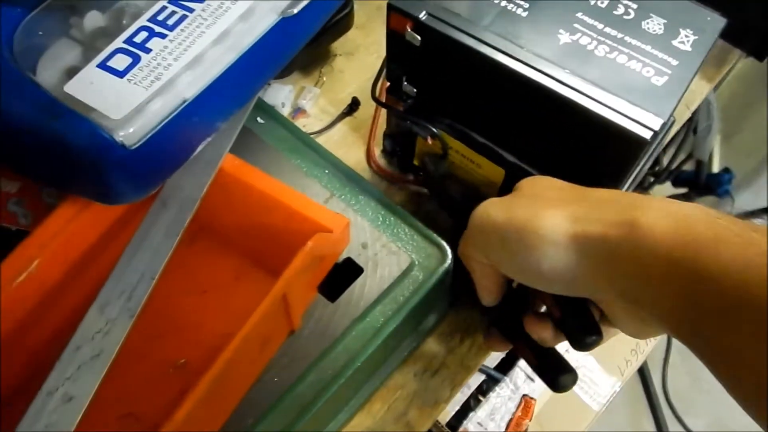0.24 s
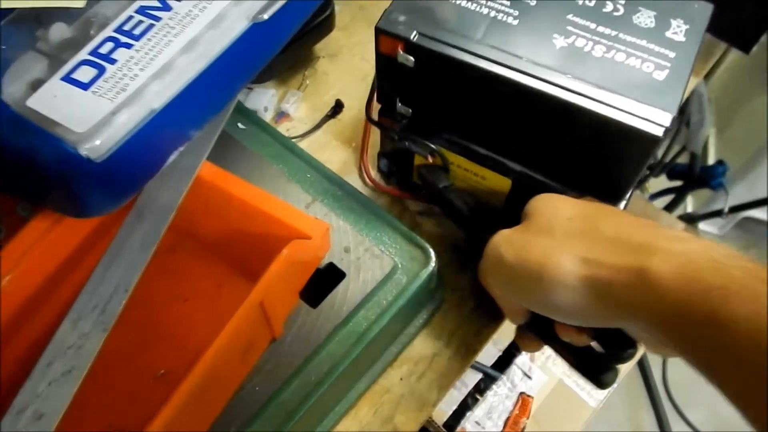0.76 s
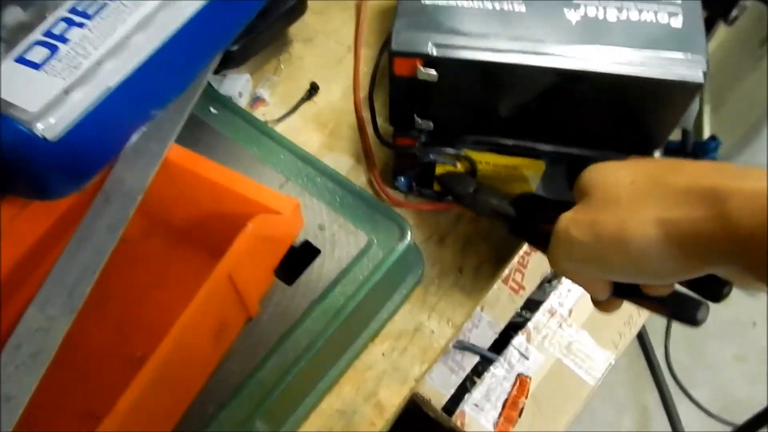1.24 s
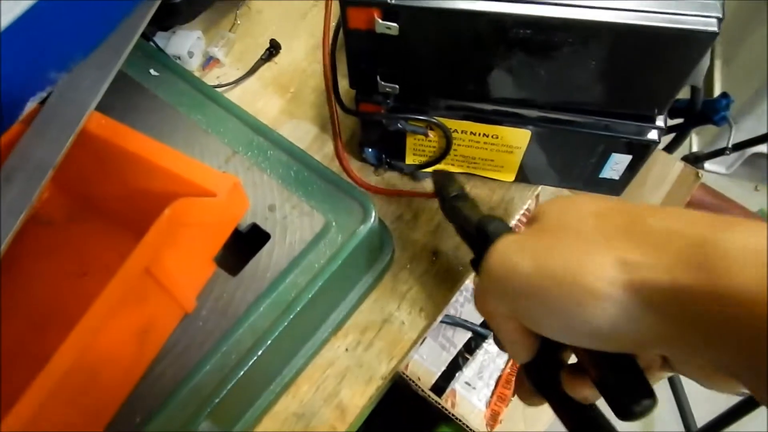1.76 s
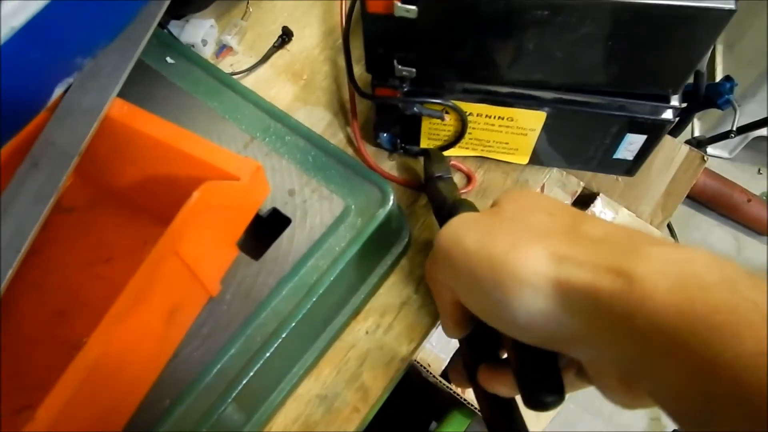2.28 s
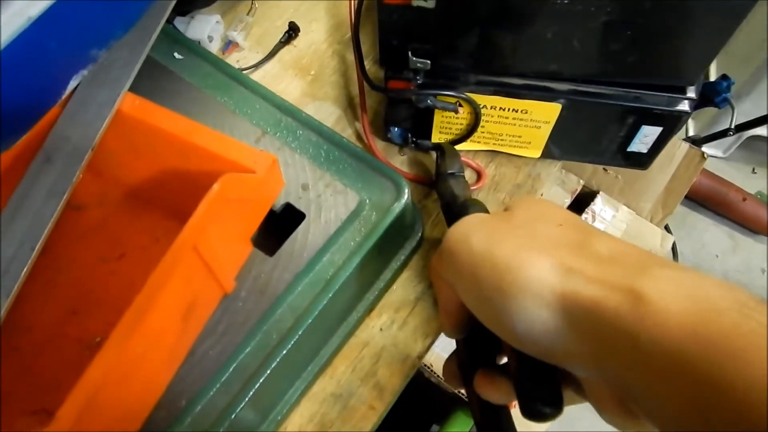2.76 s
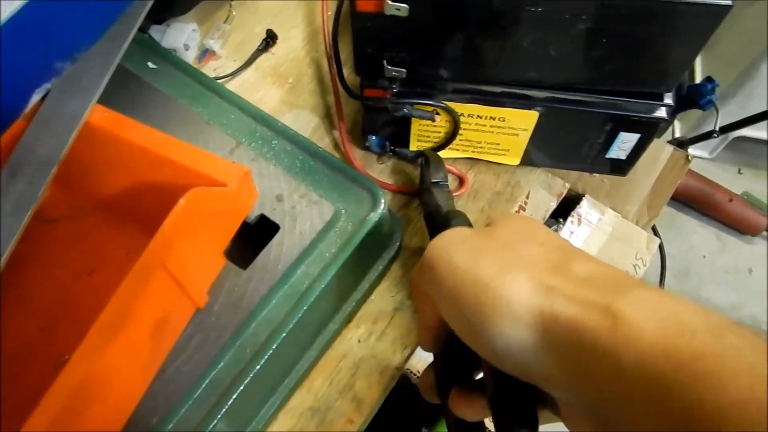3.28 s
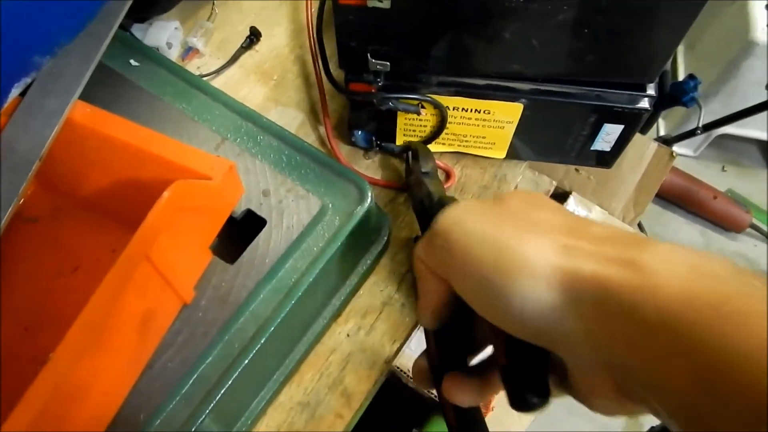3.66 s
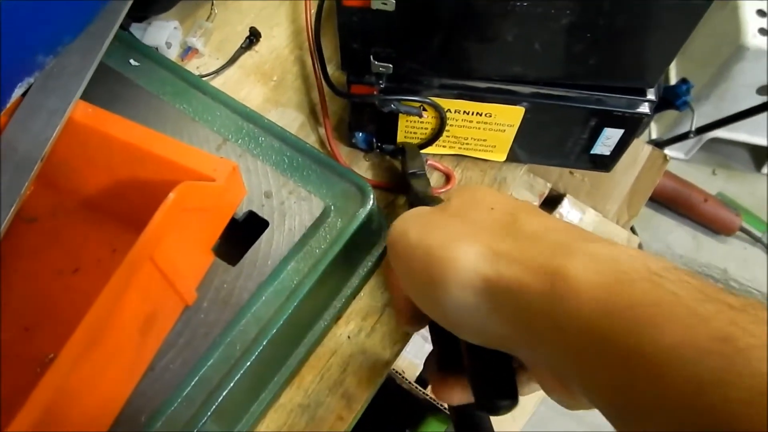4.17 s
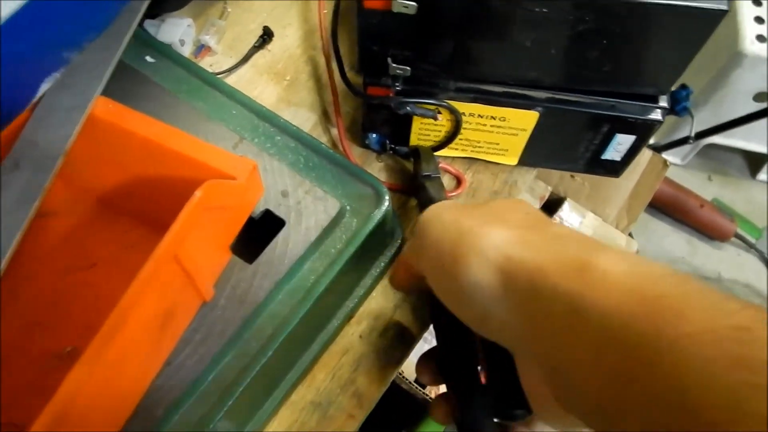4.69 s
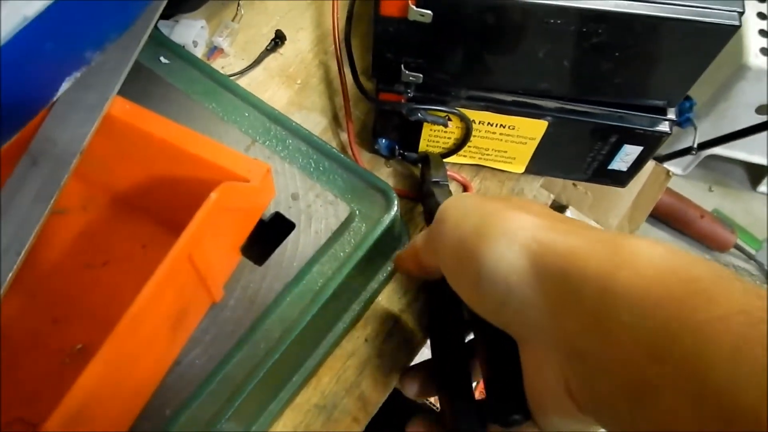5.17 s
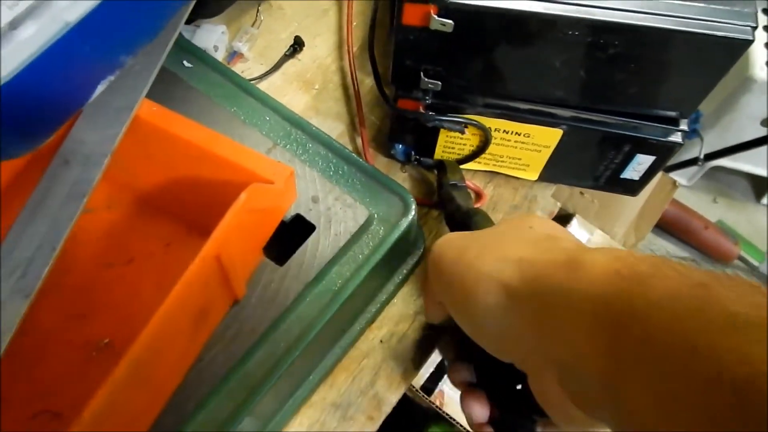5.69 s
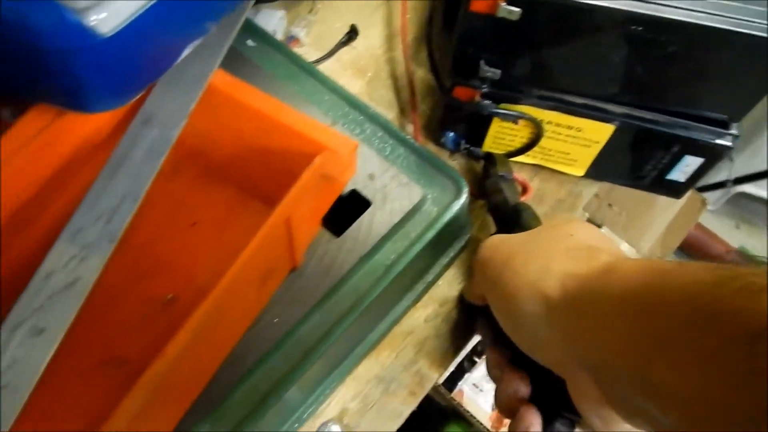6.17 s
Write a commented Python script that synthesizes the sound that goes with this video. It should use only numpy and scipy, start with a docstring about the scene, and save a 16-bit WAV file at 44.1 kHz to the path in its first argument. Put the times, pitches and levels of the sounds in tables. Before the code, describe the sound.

Workbench handling heard close: clustered woody cracks, a light uneven scrape, another sharp knock, fine bright skin and wire rustle. Quieter positioning follows, with soft dull thumps over low, wavering room rumble and faint hiss. Taps resume late, then the cutters bite through the wire with a very short, hard steel click and a dull jolt, in a small room with little echo.

```python
"""Wire cutters on a cluttered workbench

Close to a small camera in a quiet shed, a tool drags and knocks on boxes: grit and cracks ring their modes.
At last the jaws snap through a wire, bursts of chatter ringing the steel. The hand rustles as fine bright
grit with thin noise-band whistles, and the bench thumps in short low cycles of nearly steady pitch, over
a room tail and shaped air noise. The two microphones sit behind small ports that ring near 5 kHz."""
import sys
import numpy as np
from scipy import signal
from scipy.fft import rfft, irfft
from scipy.io import wavfile
from scipy.ndimage import uniform_filter1d

SR = 44100
rng = np.random.default_rng(int(sys.argv[2]) if len(sys.argv) > 2 else 0)


def store_wav(level_fs):
    """Save 16-bit WAV to argv[1]."""
    pcm = np.round(np.clip(np.atleast_2d(level_fs), -1, 1) * 32767)
    wavfile.write(sys.argv[1], SR, pcm.T.astype(np.int16))


N = 283862
T = np.arange(N) / SR
HZ = np.maximum(np.arange(N // 2 + 1) * SR / N, 1)  # bins of the spectrum, kept above 0 for the logarithm

# low modes of the boxes and bench: f/Hz, level/dB, t60/s
BOOM_MODES = [(139, -6.5, 0.088), (198.5, -6, 0.16), (239.7, 1.5, 0.13), (310, -3.5, 0.08),
              (344.5, -7, 0.09), (460, -6.5, 0.063), (521, -6, 0.13), (596, -5.5, 0.094), (732, -19, 0.33)]
# higher modes of the boxes and bench: f/Hz, level/dB, t60/s
BODY_MODES = [(803, 2, 0.072), (973, -3, 0.054), (1230, 3.5, 0.012), (1430, 4, 0.0085), (1660, 1.5, 0.021),
              (1860, -2, 0.023), (2128, -2, 0.06), (2293, -3.5, 0.065), (2694, -6.5, 0.012),
              (3154, -33.5, 0.043)]
# response of a microphone port: f/Hz, level/dB
PORT_RESPONSE = [(20, -0.5), (3000, 0.5), (3900, -7), (4400, -3.5), (4900, 8), (5300, 8.5), (5600, 6.5),
                 (6000, 2.5), (7000, -1), (8500, -2.5), (16000, -21)]


def undb(db):
    """Gain of a level in dB."""
    return 10 ** (np.asarray(db) / 20)


def along(table, column=1):
    """A column of a (Hz, ..) table on the spectrum's bins, interpolated over log frequency."""
    rows = np.array(table, float)
    return np.interp(np.log(HZ), np.log(rows[:, 0]), rows[:, column])


def heard(x, lo_hz, hi_hz):
    """The band lo_hz-hi_hz of x as it comes through the port."""
    in_band = (HZ > lo_hz) * (HZ < hi_hz)
    return irfft(rfft(x, N) * undb(along(PORT_RESPONSE)) * in_band, N)


def unit(x, lo_hz, hi_hz):
    """x scaled to rms 1 in the band lo_hz-hi_hz behind the port."""
    return x / np.std(heard(x, lo_hz, hi_hz))


def band(x, lo_hz, hi_hz):
    """Gentle band-pass."""
    return signal.sosfilt(signal.butter(2, [lo_hz, hi_hz], "band", fs=SR, output="sos"), x)


def lag(x, seconds):
    """One-pole smoothing."""
    keep = np.exp(-1 / (seconds * SR))
    return signal.lfilter([1 - keep], [1, -keep], x)


def ring(x, modes):
    """x drives a set of decaying (Hz, dB, t60) modes of alternating sign."""
    out = 0
    for k, (hz, db, t60) in enumerate(modes):
        pole = np.exp(2j * np.pi * hz / SR - np.log(1000) / (t60 * SR))
        mode = signal.lfilter([1], [1, -pole], x).imag
        out = out + (-1) ** k * undb(db) * mode / np.sqrt(t60)
    return out


def grit(rate_hz, spread_db):
    """Dense tiny slips at random moments, of very uneven size."""
    slips = rng.random(N) < rate_hz / SR
    return slips * rng.standard_normal(N) * undb(spread_db * rng.exponential(size=N))


def walk(rate_hz):
    """Slow random wander with spread 1: held random values smoothed twice."""
    k = int(SR / rate_hz)
    steps = np.repeat(rng.standard_normal(N // k + 1), k)
    x = uniform_filter1d(uniform_filter1d(steps, k), k)[:N]
    return x / x.std()


def steady(x, seconds):
    """x with its slow swells evened out."""
    return x / np.sqrt(uniform_filter1d(x ** 2, int(seconds * SR)) + 1e-12)


def swell(start, length):
    """Envelope of one movement: smooth attack, hold, smooth release."""
    # each ramp takes a share of the length, up to a longest time in s
    rise = (T - start) / min(0.33 * length, 0.13)
    fall = (start + length - T) / min(0.71 * length, 0.28)
    return np.sin(np.pi / 2 * np.clip(np.minimum(rise, fall), 0, 1)) ** 2


def add(out, s, x):
    """Lays x into out from s seconds on."""
    i = int(s * SR)
    out[..., i:i + x.shape[-1]] += x[..., :N - i]


def drags():
    """Dense stick-slip grit shakes the box walls (rasp) and their hollow (boom)."""
    # strokes of the tool over the boxes: t/s, length/s, rasp level/dB, boom minus rasp/dB
    strokes = [(0.169, 0.074, -57, 8), (0.23, 0.035, -48, -8), (0.267, 0.23, -78.5, 23.5),
               (0.581, 0.77, -54.5, 10.5), (1.351, 0.031, -59.5, 3), (1.379, 0.1, -57.5, -7),
               (1.458, 0.019, -56, -7), (1.487, 0.053, -53.5, 7.5), (1.512, .055, -39.5, -11),
               (1.548, 0.083, -57, 0), (1.723, 0.22, -62, -9), (1.965, 0.096, -57, -19),
               (2.082, 0.062, -43.5, -30), (2.129, 0.054, -76.5, 21), (2.959, 0.16, -65, 3.5),
               (3.668, 0.18, -58.5, -12), (4.528, 0.07, -53.5, -0.5), (4.703, 0.16, -74.5, 14),
               (5.285, 0.27, -52.5, 3), (5.95, 0.41, -66, 1.5), (6.269, 0.12, -58, -3)]
    slips = grit(6000, 1.5) * undb(2.2 * walk(30))
    walls = unit(ring(slips, BODY_MODES), 900, 3200)
    scrape = unit(band(slips, 730, 2900), 900, 3200)
    rasp = unit(walls + 0.29 * scrape, 600, 3200)
    boom = unit(steady(ring(slips, BOOM_MODES), .12), 180, 700)
    return sum(swell(s, length) * undb(db) * (rasp + undb(boom_db) * boom)
               for s, length, db, boom_db in strokes)


def knocks():
    """A crack at the contact, then loose parts rattle on and keep the modes going."""
    # knocks and ticks: t/s, crack peak level/dB, boom minus crack/dB, tick minus crack/dB,
    # centre of the crack f/Hz, t60 of the rattle that drives the modes/s
    contacts = [(0.175, -35.5, -2, -24, 1320, 0.11), (0.252, -29, 0.5, -18, 1200, 0.052),
                (0.272, -23.5, -7, -27, 1330, 0.018), (0.364, -56, 8.5, -18, 1340, .08),
                (0.613, -50.5, 10.5, -19, 1240, 0.074), (0.803, -41, 7.5, -7.5, 1430, 0.12),
                (0.886, -46, -7, -22, 1860, .05), (0.945, -43.5, 8, -19, 1240, .05),
                (1.116, -42.5, 4.5, -13, 2180, 0.11), (1.213, -51, 11, -22, 1660, .1),
                (1.47, -40, -18, -22, 1500, .07), (1.477, -28.5, -11.5, -27, 1700, 0.11),
                (1.5136, -21, -12.5, -17.5, 1650, .1), (1.618, -40, 3, -29, 900, .11),
                (1.739, -45.5, -18, -11, 1010, .08), (2.001, -43.5, -3.5, -18, 1430, 0.043),
                (2.055, -51, -1, 3.5, 1340, 0.044), (2.2, -38.5, -15, -24, 1430, 0.051),
                (3.052, -54, -8, 2, 1020, .07), (3.878, -52, 1.5, -6, 1440, 0.11),
                (3.997, -50.5, -6, -1.5, 1330, 0.056), (4.028, -47.5, -8, 2.5, 2100, 0.11),
                (4.542, -44, -1.5, -1.5, 1410, 0.087), (5.255, -49, 2, -5.5, 1010, .08),
                (5.388, -36.5, -18, -12, 1230, 0.094), (5.425, -36.5, -3, -15, 1050, 0.14),
                (5.539, -48.5, -1, -4, 1690, .09), (5.669, -47, 0, -8.5, 1040, 0.11),
                (5.742, -37, -14, -27, 1030, 0.11), (6.195, -43, -2, -28, 1500, 0.13),
                (6.352, -24.5, -24, -20, 2800, 0.022), (6.388, -39.5, -6, -20, 1000, 0.072)]
    rattle_db = -4  # walls shaken by the loose parts, against the crack
    out, t = np.zeros(N), T[:SR // 6]
    for s, db, boom_db, tick_db, crack_hz, t60 in contacts:
        fade = np.exp(-np.log(1000) * t / t60)
        chance = rng.standard_normal((3, len(t)))
        rattle = chance[0] * fade
        wall = band(ring(rattle, BODY_MODES), crack_hz / 1.74, crack_hz * 1.46) * fade
        impact = (.5 * chance[1] - 1) * np.exp(-t / 0.000059)
        crack = band(impact, crack_hz / 1.41, crack_hz * 1.78)
        boom = ring(rattle * fade, BOOM_MODES)
        tick = band(chance[2] * np.exp(-t / 0.0039), 3740, 6800)
        wall, crack, boom, tick = (x / np.abs(x).max() for x in (wall, crack, boom, tick))
        knock = undb(rattle_db) * wall + crack + undb(boom_db) * boom + undb(tick_db) * tick
        add(out, s, undb(db) * knock)
    return out


def snap():
    """Bursts of even chatter ring the steel jaws; later ones are duller."""
    # the jaws break through, meet and rebound: t/s, level/dB, length of the chatter/s, upper band edge f/Hz
    bursts = [(6.3229, -15.5, .0013, 16000), (6.3253, -25, .0016, 9000), (6.3290, -25, .0016, 7000)]
    # rings of the jaws: f/Hz, width/Hz, peak level/dB
    jaw_rings = [(1350, 600, -8), (2100, 500, -2), (3000, 700, -4), (4100, 900, -5), (5250, 1000, -1),
                 (6500, 1000, -7), (8300, 1200, -10), (10300, 1100, 1), (12700, 1200, 4), (14600, 1600, 9)]
    out, t = np.zeros(N), T[:SR // 50]
    for s, db, length, top_hz in bursts:
        chatter = np.sign(rng.standard_normal(len(t))) * (t < length)
        jaws = 0
        for k, (hz, width, ring_db) in enumerate(jaw_rings):
            tone = (-1) ** k * band(chatter, hz - width / 2, hz + width / 2)
            jaws = jaws + undb(ring_db) * tone / np.abs(tone).max()
        add(out, s, undb(db) * band(jaws, 500, top_hz))
    return out


def jolt():
    """The cut jolts the right microphone through the bench: one inward shove; bass roll-off swings it back."""
    start_s, rise_s = 6.3240, .0011
    level_db = [[-26], [-3]]  # left, right: peak of the shove ahead of the roll-off
    t = np.maximum(T - start_s, 0) / rise_s
    shove = -t ** 2 * np.exp(2 - 2 * t)
    roll_off = signal.butter(2, 62, "high", fs=SR, output="sos")
    return undb(level_db) * signal.sosfilt(roll_off, shove)


def rustle():
    """Fine bright grit of skin and insulation as the hand and wire move."""
    # movements of hand and wire: t/s, length/s, level/dB, thin upper part minus level/dB
    movements = [(.165, 0.033, -71, -13), (.2, 0.11, -58, -10), (0.267, 0.45, -72.5, -15),
                 (0.604, 0.74, -62.5, -8), (1.309, 0.049, -55.5, -7), (1.351, 0.05, -61.5, -14),
                 (1.372, 0.16, -65, -1), (1.464, 0.026, -48, -14), (1.493, 0.089, -66, -16),
                 (1.71, 0.33, -62.5, -14), (1.962, .09, -57, -26), (2.057, 0.042, -61, -20),
                 (2.085, 0.06, -46.5, -28), (2.137, 0.15, -69, -10), (2.283, 0.37, -75, -11),
                 (2.928, 0.27, -68, -18), (3.103, 0.12, -73, -21), (3.238, 0.26, -68.5, -22),
                 (3.652, 0.22, -67, -12), (3.852, 0.082, -66.5, -7.5), (3.973, 0.14, -73, -7),
                 (4.122, 0.6, -77, -18), (4.328, 0.45, -66.5, -8), (4.95, 0.49, -79.5, -9),
                 (5.293, .18, -58, -11), (5.375, 0.024, -44.5, -17), (5.418, 0.05, -48, -15),
                 (5.434, 0.51, -68.5, -7), (5.826, 0.41, -73, -10), (6.223, .035, -65, -22),
                 (6.267, 0.09, -59, -10)]
    patchy_db = 1.5  # spread of the uneven level
    main = unit(band(grit(6000, 2.3), 3900, 6100), 4200, 6000)
    upper = unit(band(grit(6000, 2.2), 6300, 7300), 4840, 11000)
    moves = sum(swell(s, length) * undb(db) * (main + undb(upper_db) * upper)
                for s, length, db, upper_db in movements)
    return moves * undb(patchy_db * walk(25))


def whistles():
    """Two thin wavering whistles on the rubbing: narrow noise bands that follow a drifting pitch."""
    # one list of points a whistling spell: t/s, lower f/Hz, lower level/dB, upper f/Hz, upper level/dB
    spells = [
        [(0.3, 5050, -66, 7100, -85), (0.516, 5000, -70.5, 7230, -83), (0.68, 5110, -70, 6800, -82)],
        [(1.12, 5100, -74, 6920, -76), (1.33, 4960, -68, 6700, -67.5)],
    ]
    out = np.zeros(N)
    for s, low_hz, low_db, high_hz, high_db in map(np.transpose, spells):
        touch = np.clip(np.minimum(T - s[0], s[-1] - T) / 0.02, 0, 1)
        for hz, db in ((low_hz, low_db), (high_hz, high_db)):
            waver = lag(lag(rng.standard_normal(N), 0.0015), 0.0012)
            turns = np.cumsum(np.interp(T, s, hz)) / SR
            tone = waver * np.sin(2 * np.pi * turns)
            out += touch * undb(np.interp(T, s, db)) * unit(tone, 4000, 8000)
    return out


def thumps():
    """Short, soft low cycles of nearly steady pitch that swell fast and stop; the boxes ring on a little."""
    # soft thumps through the bench: t/s, level ahead of the envelope/dB, starting pitch f/Hz, length/s
    bumps = [(1.401, -38.5, 90, 0.028), (2.069, -46, 130, 0.089), (2.141, -39.5, 95, 0.03),
             (2.209, -41.5, 227, 0.018), (2.444, -47.5, 235, 0.036), (2.601, -49.5, 64.5, 0.12),
             (3.012, -47, 200, 0.08), (3.764, -37.5, 130, 0.041), (3.772, -38.5, 208, 0.045),
             (3.886, -38.5, 140, 0.059), (4.029, -40.5, 137, 0.039), (4.659, -36, 234, 0.051),
             (4.695, -46, 126, 0.11), (6.009, -42, 73.6, 0.062), (6.09, -48, 53, 0.024)]
    # the pitch falls by under 2 % (twice this share); rms of the boxes' ring against the thumps
    pitch_fall, ring_db = 0.009, -12.5
    out = np.zeros(N)
    for s, db, hz, length in bumps:
        share = np.arange(int(length * SR)) / (length * SR)
        phase = 2 * np.pi * hz * length * (share - pitch_fall * share ** 2)
        envelope = 1.21 * share ** 0.23 * (1 - share) ** 0.91
        add(out, s, undb(db) * envelope * -np.sin(phase))
    after = ring(out, BOOM_MODES)
    return out + undb(ring_db) * after * out.std() / after.std()


def room(x):
    """Diffuse decaying tail of the shed, unrelated left and right."""
    t60_s, level_db = 0.25, -18
    t = T[:SR // 2]
    tail = rng.standard_normal((2, len(t))) * np.exp(-np.log(1000) * t / t60_s) * (t > .003)
    tail = band(band(tail, 230, 8500), 230, 8500)
    tail = tail / np.sqrt(np.sum(tail ** 2) / 2)
    return undb(level_db) * signal.fftconvolve(x[None], tail, axes=1)[:, :N]


def air():
    """Faintly drifting noise of the shed, partly alike left and right, over a rumble that comes and goes."""
    # air of the shed; in the bass only its shape counts: f/Hz, level/(dB per Hz), left-right likeness (0-1)
    shed_air = [(15, -110, 0.1), (29.4, -81.5, 0.7), (51, -76, 0.52), (130, -78, 0.4), (228, -83, 0.56),
                (540, -95, 0.17), (783, -87.5, 0.55), (1190, -97.5, 0), (1275, -93, 0.53),
                (1900, -103, 0.47), (2570, -108, 0.1), (5000, -116, 0), (7900, -126, 0), (16000, -135, .1)]
    # the low rumble swells and sinks: t/s, level ahead of the flutter/dB
    rumble_levels = [(0.0, -64), (0.37, -59.5), (1.35, -57), (1.75, -63.5), (2.23, -59), (3.3, -59.5),
                     (3.96, -57.5), (4.33, -60), (5.14, -58.5), (6.3, -52.5)]
    like = along(shed_air, column=2)
    density = undb(along(shed_air)) * np.sqrt(SR / 2 / (1 + like))
    mid, side = rfft(rng.standard_normal((2, N))) * density
    pair = mid * np.sqrt(1 + like) + np.array([[1], [-1]]) * side * np.sqrt(1 - like)
    bass = 1 / (1 + (HZ / 200) ** 4)
    rumble = irfft(pair * bass, N)
    rumble = rumble / np.std(heard(rumble.mean(axis=0), 26, 180))
    flutter_db = 2.0 * walk(14)
    drift_db = .8 * walk(3)
    rumble_db = np.interp(T, *np.transpose(rumble_levels)) + flutter_db
    return rumble * undb(rumble_db) + irfft(pair * (1 - bass), N) * undb(drift_db)


def scene():
    """Near sounds in the room, over the air."""
    handling, cut = rustle() + whistles() + drags() + knocks(), snap()
    # the crack radiates all round, so the walls get more of it; but the highest ring of the jaws
    # beams at the microphones and hardly reaches the walls
    spread = undb(9) * band(band(cut, 3300, 9000), 1500, 9000)
    return handling + cut + thumps() + room(handling + spread) + jolt() + air()


def causal(db):
    """Minimum-phase spectrum with the gains db, by folding the cepstrum."""
    cep = irfft(db * np.log(10) / 20, N)
    cep = cep * np.where(np.arange(N) < N // 2, 2, 0) - cep[0] * (np.arange(N) == 0)
    return np.exp(rfft(cep))


def record(dry):
    """Ports colour and tilt the pair, preamp hisses, gain ducks after loud peaks; notches and a steep top."""
    # tilt of the microphone pair: f/Hz, right over left level/dB
    right_tilt = [(60, 2.5), (700, 4), (1300, 1.5), (3000, 1.5), (4400, -0.5), (8000, -2), (15000, -3)]
    # narrow gaps in the treble: f/Hz, width/Hz
    treble_gaps = [(2500, 160), (5000, 60), (6000, 70), (7000, 70), (7500, 60), (8000, 70)]
    right_lag_s, hiss_db, top_hz = .00003, -79.5, 15750
    duck_db, duck_depth = -16, 400  # threshold, strength
    attack_s, release_s = .008, .4  # smoothing times of the gain control
    side = np.array([[-.5], [.5]])  # left, right
    tilt = undb(side * along(right_tilt))
    delay = np.exp(-2j * np.pi * HZ * side * right_lag_s)
    ports = causal(along(PORT_RESPONSE)) * tilt * delay
    x = irfft(rfft(dry) * ports, N) + undb(hiss_db) * rng.standard_normal((2, N))
    over = np.maximum(np.abs(x).max(axis=0) - undb(duck_db), 0)
    x = x / (1 + duck_depth * lag(lag(over, attack_s), release_s))
    for hz, width in treble_gaps:
        x = signal.lfilter(*signal.iirnotch(hz, hz / width, SR), x)
    return signal.sosfilt(signal.ellip(10, .2, 80, top_hz, fs=SR, output="sos"), x)


dry = scene()
out = record(dry)
store_wav(out)
```